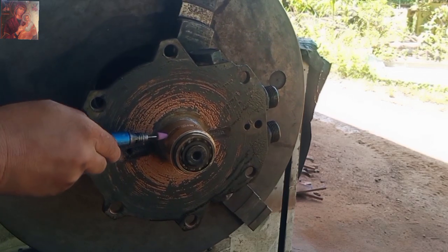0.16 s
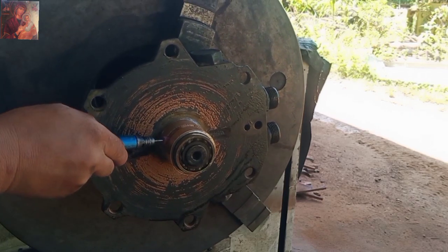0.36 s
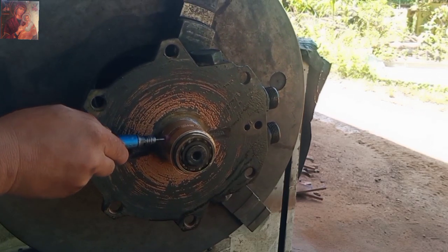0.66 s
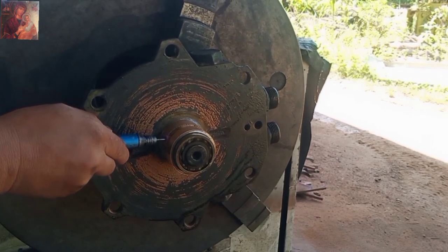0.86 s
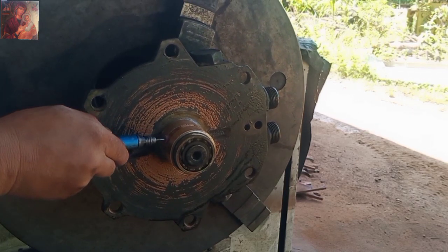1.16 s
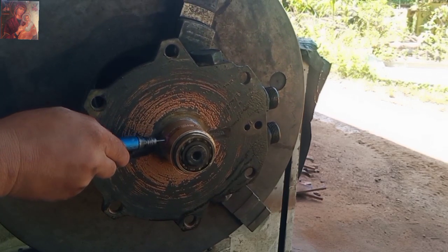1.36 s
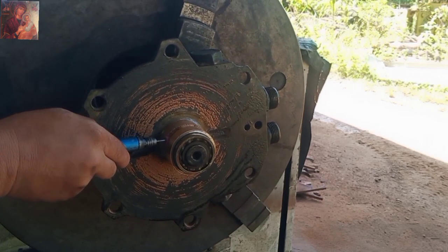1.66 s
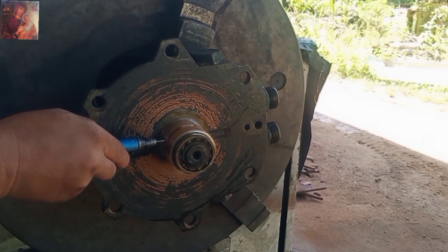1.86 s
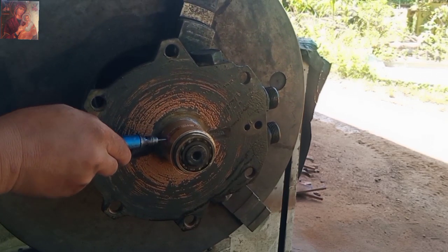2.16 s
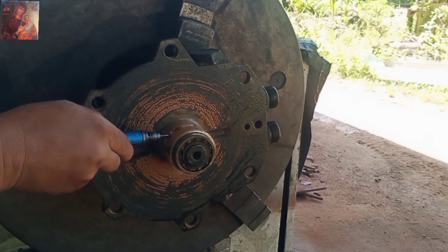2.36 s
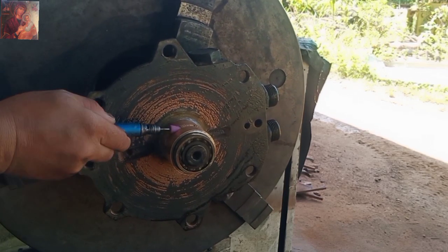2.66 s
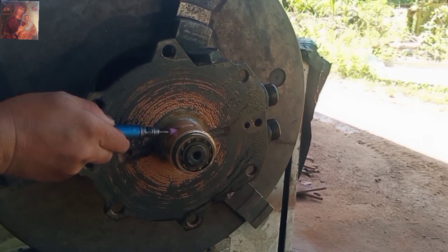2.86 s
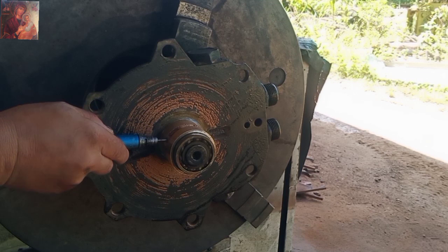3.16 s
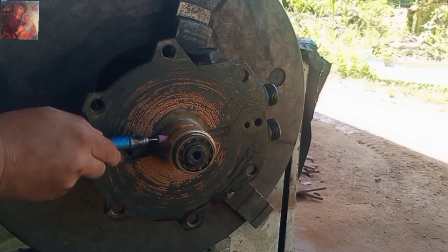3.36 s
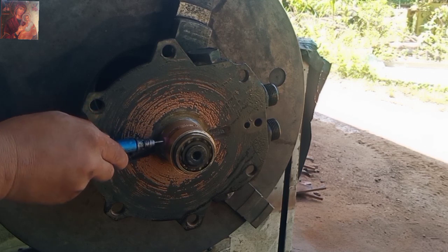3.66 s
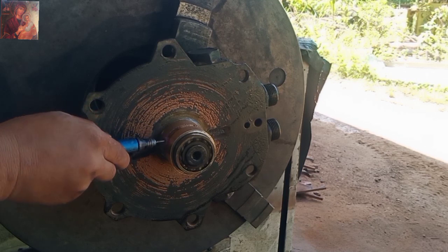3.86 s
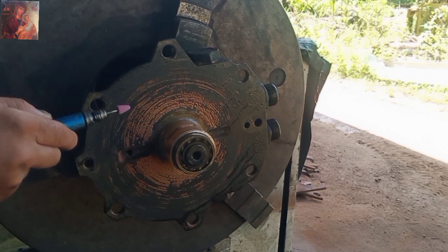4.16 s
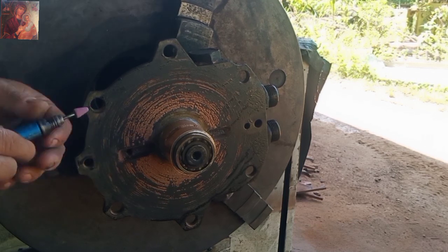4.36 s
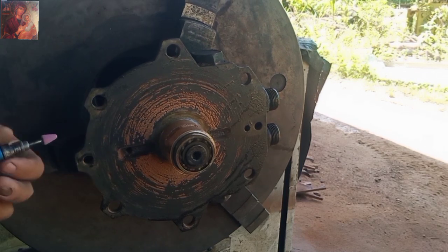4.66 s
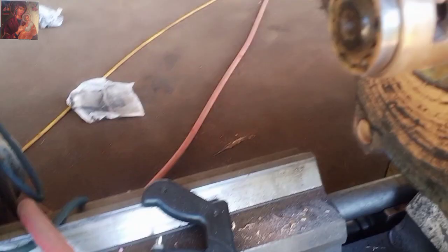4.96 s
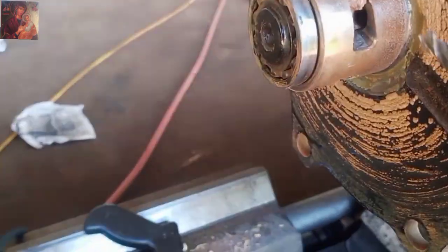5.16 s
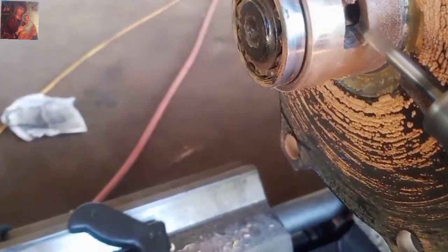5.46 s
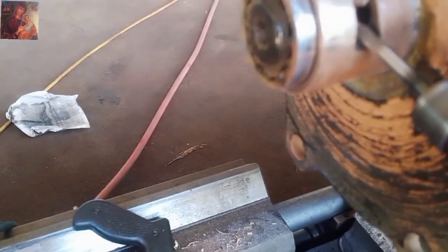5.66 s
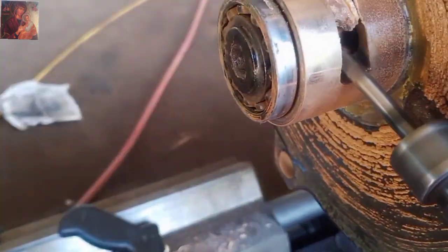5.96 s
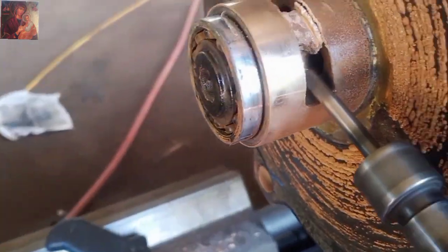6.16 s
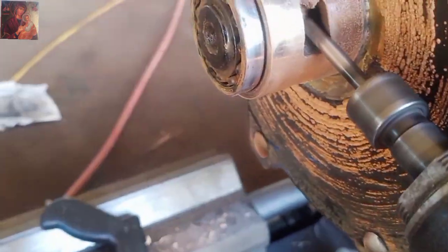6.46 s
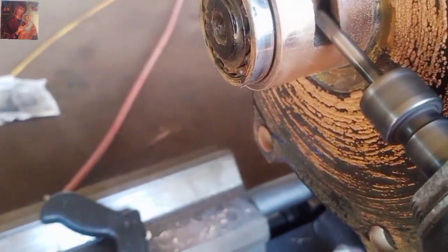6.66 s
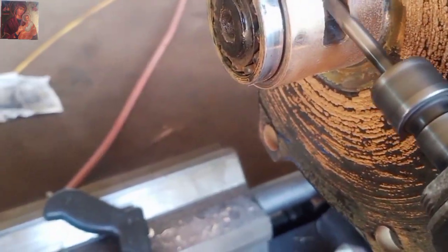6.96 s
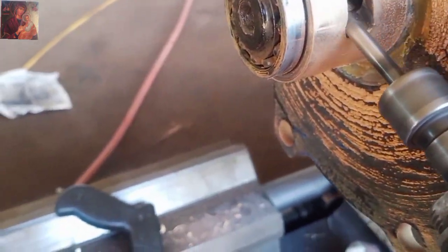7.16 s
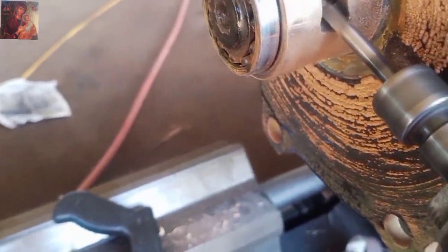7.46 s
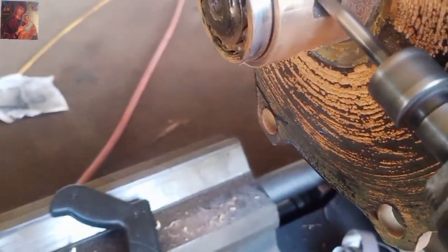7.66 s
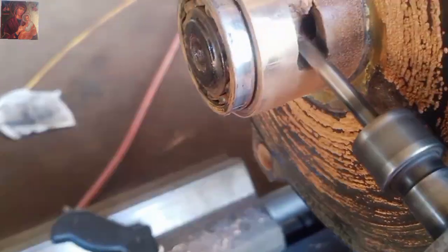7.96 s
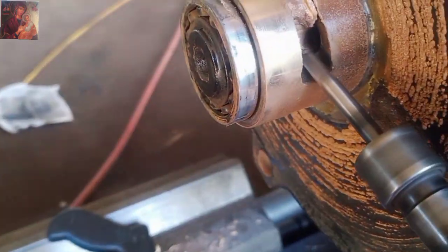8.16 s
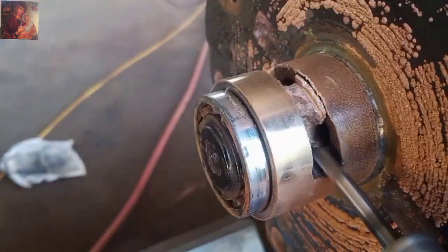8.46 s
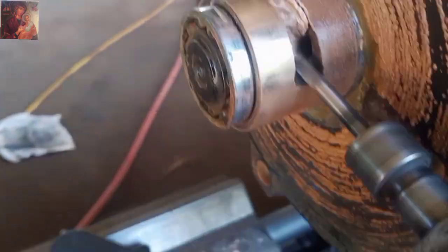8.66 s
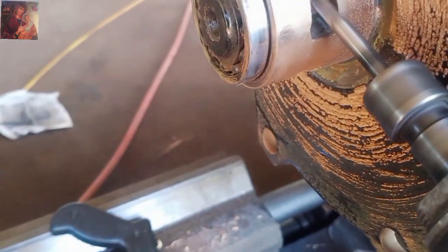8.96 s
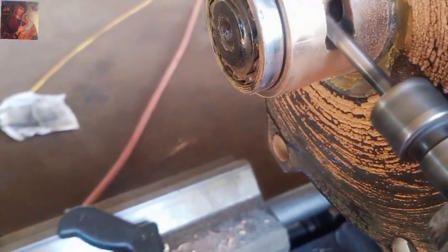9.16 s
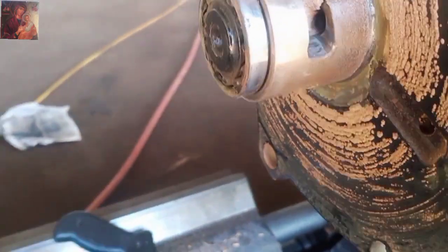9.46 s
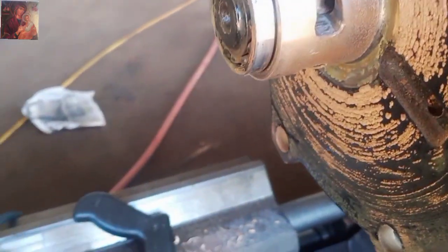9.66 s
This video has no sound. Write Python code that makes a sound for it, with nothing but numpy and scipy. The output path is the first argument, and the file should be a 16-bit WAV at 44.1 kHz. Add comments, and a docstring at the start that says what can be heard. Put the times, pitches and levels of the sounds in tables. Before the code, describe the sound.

A small air grinder hisses and whines against metal, then a larger one blasts loudly with a steady whine and cuts off.

```python
"""Two air grinders in an open workshop. First a pencil grinder hisses and scrapes, its vane whine
sagging whenever the stone bites; hollow drones come and go as the tool is moved. Then air bleeds from a
larger grinder, which is triggered, bogs, runs at full blast into overload and stops, with dull low
thumps at either end. A light breeze rumbles at the two microphone ports at first; later the big
grinder's exhaust buffets them. The ports hear mostly unrelated turbulence."""
import sys
import numpy as np
from scipy import signal
from scipy.io import wavfile

SR = 44100
rng = np.random.default_rng(int(sys.argv[2]) if len(sys.argv) > 2 else 0)


def to_wav(sig):
    """Store sig (one row per channel, or 1-D mono) as 16-bit WAV at the path in sys.argv[1].

    Samples outside -1..1 are clipped; the rate is SR.
    """
    pcm = np.clip(np.atleast_2d(sig), -1, 1) * 32767
    pcm = np.round(pcm).astype(np.int16)
    wavfile.write(sys.argv[1], SR, pcm.T)  # frames by channels


N = 433503
TIME = np.arange(N) / SR

# stereo tilt with the microphone far from the tool and near it: f/Hz, left minus right/dB
FAR_BALANCE = [(60, -9), (200, -11), (450, -41), (800, -8), (1300, -9.5), (2400, -1), (4400, -1),
               (5800, 19), (7000, -2), (8500, -18), (10500, -7), (12500, -6.5), (15000, 2.5)]
NEAR_BALANCE = [(60, -10), (150, -12.5), (400, -5), (750, -4), (1300, -0.5), (2400, 0), (4000, 3.5),
                (5700, 1), (6600, 1), (7700, -9.5), (9500, -1.5), (12000, -0.5), (15000, 2.5)]


def pencil_grinder():
    """Exhaust hiss with faint whistles, and the scrape of the stone, which sets the work piece ringing."""
    levels = [(0.0, -24, -43.5), (1.2, -24, -41.5), (1.65, -24, -45.5), (1.75, -24.5, -41.5),
              (4.2, -24.5, -39), (4.31, -26.5, -39), (4.59, -21.5, -37.5), (4.65, -25, -38.5),
              (4.96, -22, -33.5), (4.978, -23, -35)]   # t/s, hiss/dB, scrape/dB
    hiss_colour = [(2060, -60.5), (3500, -39), (3870, -10.5), (4170, -4.5), (5020, -12.5), (5900, -33),
                   (6600, -8.5), (7570, 5), (9710, -3), (10300, 4), (11300, -1.5), (14500, 1.5),
                   (15500, -2)]   # exhaust spectrum: f/Hz, density/dB
    scrape_colour = [(350, -15), (600, -8.5), (1040, -7), (1700, -2.5), (3550, -1.5), (3750, -18),
                     (4000, 6), (5200, -22.5), (8800, -120)]   # stone spectrum: f/Hz, density/dB
    # right-port whistles: f/Hz, width/Hz, level re hiss/dB before and after the hand shifts
    whistles = [(7240, 230, -11, -8), (7800, 300, -7.5, -3), (10520, 410, -5, -9.5), (12100, 600, -9, -16),
                (13900, 500, -8, -14)]
    hand_shift_s, lift_s = (2.2, 2.64), (4.1, 4.5)
    gate, hiss_db, scrape_db = envelopes(levels)
    size = np.flatnonzero(gate)[-1]
    hiss = turbulence(gate, hiss_colour, FAR_BALANCE,
                      flicker_db=1, gust_db=1, swell_db=.15, alike=.082, lag=-9, per_octave=4)
    hiss[0] *= amp(np.interp(TIME, lift_s, [0, -4.5]))   # the tool is drawn away from the left port
    for hz, width_hz, *ends_db in whistles:
        gain = amp(np.interp(TIME[:size], hand_shift_s, ends_db))
        hiss[1, :size] += gate[:size] * gain * narrow_noise(hz, width_hz, size)
    scrape = turbulence(gate, scrape_colour[:-1], FAR_BALANCE,
                        flicker_db=3.64, gust_db=.78, swell_db=.73, alike=.31, lag=-8, per_octave=3)
    work_ring = narrow_noise(hz=1756, width_hz=440, size=size)
    scrape[:, :size] += gate[:size] * amp(-10) * work_ring
    return amp(hiss_db) * hiss + amp(scrape_db) * scrape


def pencil_whine():
    """Six harmonics of the vane rate; the harder the stone bites, the more they chatter and rasp."""
    harmonic_levels = [(0.0, -44, -36, -26, -28, -30, -32), (0.16, -42, -30, -36, -35, -34, -31),
                       (0.31, -36, -37, -37, -40, -27, -39), (0.46, -40, -36, -38, -37, -23, -38),
                       (0.62, -42, -41.5, -34, -41, -23, -44), (0.78, -39, -41, -38, -39, -23, -45),
                       (0.93, -38, -35, -35, -35, -26, -33), (1.08, -49, -32, -33, -28, -41, -36),
                       (1.24, -36, -38, -38, -32, -24, -34), (1.4, -34.5, -36, -39, -43, -21.5, -34),
                       (1.55, -36, -37, -39, -43, -22, -36), (1.7, -37, -34, -33, -40, -26, -29),
                       (1.86, -33, -34, -33.5, -45, -26, -32), (2.02, -36, -39, -36, -35, -26, -34),
                       (2.17, -42, -41, -38, -36, -30, -33), (2.33, -39, -34.5, -35, -33, -34, -28),
                       (2.48, -33, -36, -40, -30, -32, -31), (2.64, -33, -35, -36, -44, -27, -22.5),
                       (2.79, -33, -37, -39, -45, -35, -26), (2.94, -39, -29, -30, -49, -36, -36),
                       (3.1, -34, -34, -39, -23, -26, -37), (3.26, -41, -33, -45, -20, -29, -36),
                       (3.41, -35, -35, -32, -33, -33, -41), (3.56, -37, -39, -36, -43, -24, -41),
                       (3.72, -36, -33, -34, -53, -32, -42), (3.88, -34, -33, -37, -31, -29, -28),
                       (4.03, -26, -34, -36, -34, -37, -32), (4.18, -44, -34, -36, -43, -24, -28),
                       (4.34, -35, -38.5, -38, -29, -23.5, -35), (4.5, -40, -34.5, -40, -33, -25, -36),
                       (4.65, -45, -37, -46, -40, -31, -32), (4.8, -45, -45, -48, -27, -30, -31),
                       (4.98, -32, -41, -34, -20, -35, -33)]   # t/s, level/dB of harmonics 1 to 6
    balance = [(1400, -12), (1600, 1), (1800, -4), (2700, -3), (3150, 1.5), (3650, 2), (4100, 6), (5400, 1),
               (6300, 6), (6900, -8), (7300, -20), (7900, -24), (9100, -24), (11000, -12)]   # f/Hz, left minus right/dB
    scoop = [(3800, 0), (4200, -3), (5000, -2), (5550, -1), (5800, -14), (6500, -12), (6900, 0)]   # range where the whine is fainter: f/Hz, gain/dB
    end_s, free_hz, rasp_hz = 4.98, 1850, 95
    size = round(end_s * SR)
    vane_hz = vane_rate(TIME[:size], end_s)
    load = np.clip(1 - vane_hz / free_hz, 0, 1)
    chatter = (.003 + .016 * load) * drift(55, size)
    hand_shake = .012 * load * drift(9, size)
    turn = 2 * np.pi * np.cumsum(vane_hz * (1 + chatter + hand_shake)) / SR
    phase = np.stack([turn - 2 * np.pi * vane_hz * 9.4 / SR, turn])   # left port: 9.4 samples farther
    roughness = np.clip(.2 + 2.2 * load, 0, .5)
    out = np.zeros((2, N))
    for k, level_db in enumerate(envelopes(harmonic_levels)[1:], 1):
        colour_db = at_hz(balance, k * vane_hz) * [[1], [0]] + at_hz(scoop, k * vane_hz)
        rasp_share = roughness * min(k / 2, 1) ** 2   # the fundamental stays firmer
        rasp = np.sqrt(rasp_share) * drift(rasp_hz, size) * np.cos(k * phase)
        tone = np.sqrt(1 - rasp_share) * np.sin(k * phase) + rasp
        flutter_db = 2.8 * drift(20, size)
        out[:, :size] += amp(level_db[:size] + colour_db + flutter_db) * tone
    return out


def vane_rate(t, end_s):
    """Each bite of the stone drags the pencil grinder below idle; the rotor follows with a lag."""
    # overlapping bites add: t/s, length/s, lean-in/s, sag once leant in/Hz, final sag/Hz
    bites = [(0.069, 0.93, .15, 105, 110), (0.187, 0.074, 0.027, 90.6, 80), (0.304, 0.077, 0.014, 101, 110),
             (0.408, .14, .08, 45.3, 40), (.6, 0.089, .06, 60.2, 59), (0.728, 0.12, 0.036, 69.7, 30),
             (0.914, 0.047, 0.022, 131, 129), (1.164, .77, 0.19, 290, 320), (1.2, .14, 0.068, 79.5, 0),
             (1.371, .08, 0.038, 40, 31), (1.502, 0.071, .04, 70.7, 49.5), (1.639, .05, 0.027, 120, 92),
             (1.741, .1, 0.033, 170.6, 110), (1.929, .33, 0.0095, 100, 110), (2.02, .12, .05, 109.6, 60),
             (2.186, 0.075, 0.021, 30, 30.5), (2.431, 0.45, 0.041, 74.8, 70),
             (2.691, .17, .12, 100.2, 119.5), (2.851, .24, .03, 331, 299.5),
             (2.86, 0.039, .015, 230, 230.5), (2.921, .07, .03, 71, 39.5), (3.294, 0.5, .14, 344, 350),
             (3.412, 0.076, .04, 110.4, 39), (3.54, 0.092, 0.051, 40, 20),
             (3.684, 0.074, 0.019, 120.2, 40.5), (4.149, .77, 0.36, 55, 41), (4.547, 0.062, .02, 70, 70.5),
             (4.642, 0.054, 0.023, 45, 45)]
    idle_hz, inertia_s, work_s = 1826, .014, (.15, 4.8)
    hz = idle_hz + 70.13 * np.interp(t, [0, *work_s, end_s], [1, 0, 0, 1])   # faster at either end
    for start, length, lean, first_hz, last_hz in bites:
        hz -= np.interp(t, [start, start + lean, start + max(length, lean)], [0, first_hz, last_hz], right=0)
    r = np.exp(-2 / (inertia_s * SR))
    return hz[0] + signal.lfilter([(1 - r) ** 2], [1, -2 * r, r * r], hz - hz[0])


def big_grinder():
    """Exhaust blast and a wavering motor whine, which stutters and dulls when the motor bogs."""
    run = [(5.32, 599, -36), (5.35, 718, -28), (5.37, 858, -22), (5.386, 810, -22), (5.402, 692, -31),
           (5.414, 580, -28), (5.43, 493, -32), (5.45, 440, -25), (5.498, 460, -27), (5.517, 503, -30),
           (5.533, 552, -23), (5.555, 629, -37), (5.578, 752, -23), (5.588, 800, -34), (5.6, 860, -19),
           (5.616, 908, -28), (5.65, 971, -23.5), (6.0, 929.5, -24.5), (7.1, 930.3, -23.5),
           (8.3, 938.6, -25), (9.21, 951, -23)]   # t/s, motor rate/Hz, whine/dB
    blast_colour = [(150, -19.5), (250, -17), (852, -16.5), (928, -14.5), (1050, -16), (1850, -12.5),
                    (2150, -13), (2400, -14), (3160, -8.5), (3500, -14), (3900, -9), (4400, -9),
                    (5150, -13.5), (5600, -8.5), (6200, -16), (6850, -11), (7600, -8.5), (8300, -11.5),
                    (8900, -12.5), (10600, -15.5), (12200, -14), (13500, -12), (15500, -11.5)]   # exhaust spectrum: f/Hz, density/dB
    whine_harmonics = [(1, 7.5, 0), (2, 8, 3), (4, 2.5, -5)]   # harmonic, left/dB, right/dB re whine
    puff_harmonics = [(3, -25, -27), (4, -20, -23), (5, -12, -13), (6, -17, -8), (7, -20, -19),
                      (8, -27, -21), (9, -31, -13)]   # harmonic, left/dB, right/dB re blast
    port_lead = [(980, -.3), (1800, -2.6), (2000, -2.6), (3600, .2), (3900, .2), (5400, 2.5)]   # f/Hz, phase lead of the right port/rad
    gate, motor_hz, whine_db = envelopes(run)
    valve, blast = exhaust_flow(motor_hz)
    out = blast * turbulence(valve, blast_colour, NEAR_BALANCE,
                             flicker_db=1, gust_db=1, swell_db=.1, alike=.079, lag=10, per_octave=6)
    on = gate > 0
    size, hz = on.sum(), motor_hz[on]
    jitter = .00904 * drift(29.4, size)
    wander = .00598 * (hz > 900) * drift(12, size)   # only at full blast
    turn = 2 * np.pi * np.cumsum(hz * (1 + jitter + wander)) / SR
    stutter_db = 1.1 + 5 * np.clip(1 - hz / 900, 0, 1)
    dulling_db = np.clip(40 * np.log2(hz / 930), -6.5, 0)

    def harmonic(k):
        """One multiple of the motor rate as it reaches the two ports."""
        lead = np.interp(k * hz, *np.transpose(port_lead))
        return np.sin(k * turn + lead * [[0], [1]])

    for k, left_db, right_db in whine_harmonics:
        level_db = whine_db[on] + (k - 1) * dulling_db + stutter_db * drift(16, size)
        out[:, on] += gate[on] * amp(level_db + [[left_db], [right_db]]) * harmonic(k)
    for k, left_db, right_db in puff_harmonics:   # uneven puffs smear these into breathy bands
        out[:, on] += blast[on] * amp([[left_db], [right_db]]) * drift(68, size) * harmonic(k)
    return out


def exhaust_flow(motor_hz):
    """Gate and gain of the blast: the trigger opens it, it dips as the motor bogs and dies on release."""
    trigger_s, open_s, release_s = 5.305, .013, 9.2
    blast_db, bog_db_per_octave, decay_db_per_s = -10.5, 8.5, 447
    valve = np.clip((TIME - trigger_s) / open_s, 0, 1) * (TIME < release_s + .1)
    coming_hz = np.interp(TIME + .011, TIME, motor_hz)   # the flow changes just ahead of the speed
    bog_db = bog_db_per_octave * np.log2(np.minimum(coming_hz / 850, 1))
    return valve, amp(blast_db + bog_db - decay_db_per_s * np.maximum(TIME - release_s, 0))


def air_bleed():
    """Thin hiss of air escaping the big grinder while its trigger is shut."""
    # each table holds one set before the run and one after
    levels = [
        [(4.98, -21), (4.994, -19.5), (5.23, -19), (5.296, -23), (5.31, -14)],
        [(9.2, -15), (9.264, -21.5), (9.64, -20.5), (9.69, -20), (9.83, -17)],
    ]   # t/s, level/dB
    colours = [
        [(290, -80), (500, -49), (748, -32), (901, -21.5), (1510, -19), (1800, -22), (1960, -15.5), (3230, -8),
         (4840, -8), (9100, -1.5), (12000, -8), (15500, 0)],
        [(240, -80), (400, -46), (643, -21), (784, -38), (942, -20.5), (1340, -13.5), (2590, -6.5),
         (3910, -0.5), (4920, -11), (7780, -1), (11800, -8.5), (15500, -0.5)],
    ]   # f/Hz, density/dB
    balances = [
        [(600, 11), (1400, 4), (2300, -1), (3500, 10), (4500, 0), (6000, -1), (8000, -12), (10500, -5),
         (12000, 2), (15000, 5)],
        [(600, 4), (1400, -4), (2500, -2), (3500, 0.5), (5000, 0), (6500, -3), (7800, -21), (10000, -7),
         (12000, -2), (15000, -1)],
    ]   # f/Hz, left minus right/dB
    out = 0
    for rows, colour, balance in zip(levels, colours, balances):
        gate, level_db = envelopes(rows)
        hiss = turbulence(gate, colour, balance,
                          flicker_db=1.9, gust_db=.8, swell_db=.14, alike=.074, lag=4.3, per_octave=5)
        out = out + amp(level_db) * hiss
    return out


def low_thumps():
    """Dull low thumps and puffs of air as the big grinder starts and stops."""
    thumps = [(5.15, -38, 149, 0.0045, 10), (5.227, -21.5, 230, 0.0023, 11), (5.246, -32, 159, 0.0045, 12),
              (5.29, -32, 198, .005, 10), (9.208, -23.5, 529, 0.0065, 0), (9.234, -29, 221.7, 0.0037, -2),
              (9.264, -40, 410, 0.0053, -1), (9.305, -38, 108, 0.0055, -5)]   # t/s, peak/dB, f/Hz, rise/s, left minus right/dB
    t = TIME[:4000]
    out = np.zeros((2, N))
    for start_s, peak_db, hz, rise, pan_db in thumps:
        thump = amp(peak_db) * np.sin(2 * np.pi * hz * t) * t / rise * np.exp(1 - t / rise)
        start = round(start_s * SR)
        out[:, start:start + len(t)] += thump * amp([[pan_db / 2], [-pan_db / 2]])
    return out


def port_buffeting():
    """A light breeze rumbles at the ports at first; later the big grinder's exhaust buffets them heavily."""
    breeze_levels = [(0.0, -52), (0.6, -52), (1.1, -59), (1.96, -56.5), (2.4, -62), (2.9, -65), (3.33, -54),
                     (3.9, -56.5), (4.25, -72), (4.64, -62), (4.79, -51), (4.98, -47.5)]   # t/s, level/dB
    breeze_colour = [(18, -57), (30, -27), (140, -10.5), (178, -13.5), (362, 0), (424, -3), (598, 1),
                     (700, -16), (910, -30), (1540, -120)]   # f/Hz, density/dB
    breeze_balance = [(60, -10), (150, -10), (300, -18), (450, -16), (800, -8)]   # f/Hz, left minus right/dB
    buffet_levels = [(4.98, -66), (5.1, -56), (5.21, -50), (5.24, -42), (5.29, -47), (5.34, -35),
                     (5.45, -52), (5.64, -29.5), (9.14, -31), (9.21, -34), (9.3, -60), (9.83, -66)]   # t/s, level/dB
    buffet_colour = [(12, -47), (20, -34), (43, -13), (128, 0), (331, -8), (400, -1.5), (520, -13),
                     (880, -120)]   # f/Hz, density/dB
    gate, breeze_db = envelopes(breeze_levels)
    breeze = turbulence(gate, breeze_colour[:-1], breeze_balance,
                        flicker_db=1.9, gust_db=3.55, swell_db=.6, alike=.076, lag=0, per_octave=2)
    gate, buffet_db = envelopes(buffet_levels)
    buffet = turbulence(gate, buffet_colour[:-1], NEAR_BALANCE,
                        flicker_db=1.1, gust_db=.31, swell_db=.94, alike=.014, lag=0, per_octave=2)
    return amp(breeze_db) * breeze + amp(buffet_db) * buffet


def hollow_drones():
    """Two faint, narrow bands of noise that swell while the pencil grinder is moved."""
    swells = [
        [(1.84, -75), (1.88, -59), (2.1, -67), (2.4, -58), (2.75, -72)],
        [(3.5, -70), (3.9, -48), (4.0, -57), (4.15, -53), (4.26, -44), (4.4, -48), (4.9, -39.5), (4.98, -39)],
    ]   # one set per drone: t/s, level/dB
    tones = [(585, 27, 2, 2), (480, 83, -1.2, 0.48)]   # f/Hz, width/Hz, left/dB, right/dB
    out = np.zeros((2, N))
    for rows, (hz, width_hz, left_db, right_db) in zip(swells, tones):
        gate, level_db = envelopes(rows)
        on = gate > 0
        drone = gate[on] * amp(level_db[on]) * narrow_noise(hz, width_hz, on.sum())
        out[:, on] += drone * amp([[left_db], [right_db]])
    return out


def turbulence(gate, colour, balance, flicker_db, gust_db, swell_db, alike, lag, per_octave):
    """Rushing air in noise bands; the power share `alike` reaches both ports, the right `lag` samples on."""
    on = np.flatnonzero(gate)
    size = on[-1] - on[0] + 1
    low_hz, top_hz = colour[0][0], min(1.2 * colour[-1][0], 18500)
    edges = np.geomspace(low_hz, top_hz, int(per_octave * np.log2(top_hz / low_hz)) + 1)
    own, shared = rng.standard_normal((2, 2, size)), rng.standard_normal((2, size))
    shared_at_ports = np.stack([shared, np.roll(shared, lag, axis=1)], axis=1)
    white = np.sqrt(1 - alike) * own + np.sqrt(alike) * shared_at_ports
    together_db = gust_db * drift(74, size) + swell_db * drift(3.1, size)   # moves all bands as one
    flicker = amp(flicker_db * drift(19.2, size + 40000))
    air = 0
    for k, (low, high) in enumerate(zip(edges, edges[1:])):
        band = signal.sosfilt(signal.butter(2, [low, high], "band", fs=SR, output="sos"), white[k % 2])
        hz = np.sqrt(low * high)
        left = amp(at_hz(balance, hz))
        sides = amp(at_hz(colour, hz)) * np.array([[left], [1]]) / np.hypot(left, 1)
        skip = k * 17000 % 40000   # each band flickers at its own moments
        air = air + sides * band * flicker[skip:skip + size]
    out = np.zeros((2, N))
    out[:, on[0]:on[-1] + 1] = amp(together_db) * air / np.sqrt(np.mean(air.mean(0) ** 2))
    return gate * out


def narrow_noise(hz, width_hz, size):
    """Breathy pitch: noise sent twice through one resonance, at rms 1."""
    r, x = np.exp(-np.pi * width_hz / SR), rng.standard_normal(size)
    for _ in range(2):
        x = signal.lfilter([1, 0, -1], [1, -2 * r * np.cos(2 * np.pi * hz / SR), r * r], x)
    return rms_one(x)


def drift(rate_hz, size):
    """Smooth random modulation, mostly below rate_hz, with rms near 1."""
    step = 16
    r = np.exp(-2 * np.pi * rate_hz * step / SR)
    slow = signal.lfilter([1], [1, -2 * r, r * r], rng.standard_normal(size // step + 3002))[3000:]
    return np.interp(np.arange(size) / step, np.arange(len(slow)), rms_one(slow))


def envelopes(rows):
    """A gate open from first row to last with 4 ms fades, then each column as a curve in time."""
    times, *columns = np.transpose(rows)
    gate = np.interp(TIME, [times[0] - .004, times[0], times[-1], times[-1] + .004], [0, 1, 1, 0])
    return [gate] + [np.interp(TIME, times, column) for column in columns]


def at_hz(points, hz):
    """A spectrum read on a log-frequency axis."""
    points_hz, points_db = np.transpose(points)
    return np.interp(np.log(hz), np.log(points_hz), points_db)


def amp(db):
    """Decibels to gain."""
    return 10 ** (np.asarray(db) / 20)


def rms_one(x):
    """Scaled to rms 1."""
    return x / np.sqrt(np.mean(x ** 2) + 1e-20)


def scene():
    """Both grinders, the thumps and the buffeting at the two ports."""
    pencil = pencil_grinder() + pencil_whine() + hollow_drones()
    return pencil + big_grinder() + air_bleed() + low_thumps() + port_buffeting()


def record(dry):
    """The level drops out briefly, peaks clip near full scale, and the top treble is cut steeply."""
    dropout_s, floor, cutoff_hz = 9.43, amp(-19), 15480
    fall_s, hold_s, rise_s = .002, .0039, .017
    dip = np.interp(TIME - dropout_s, np.cumsum([0, fall_s, hold_s, rise_s]), [1, floor, floor, 1])
    clipped = np.clip(dry * dip, -.97, .97)
    return signal.sosfilt(signal.ellip(12, .5, 60, cutoff_hz, fs=SR, output="sos"), clipped)


dry = scene()
out = record(dry)
to_wav(out)
```